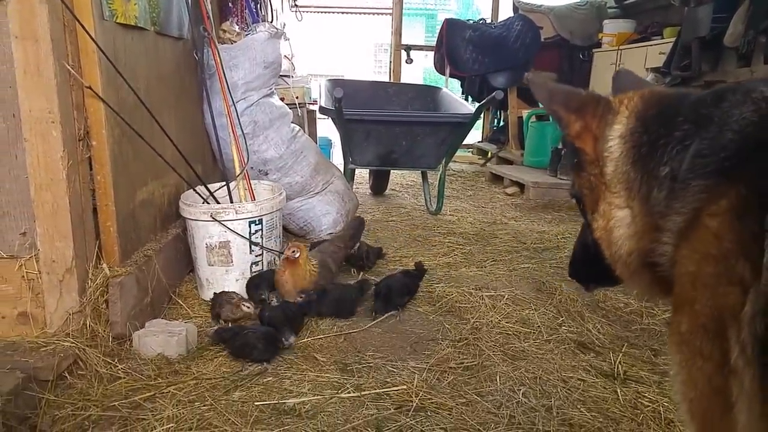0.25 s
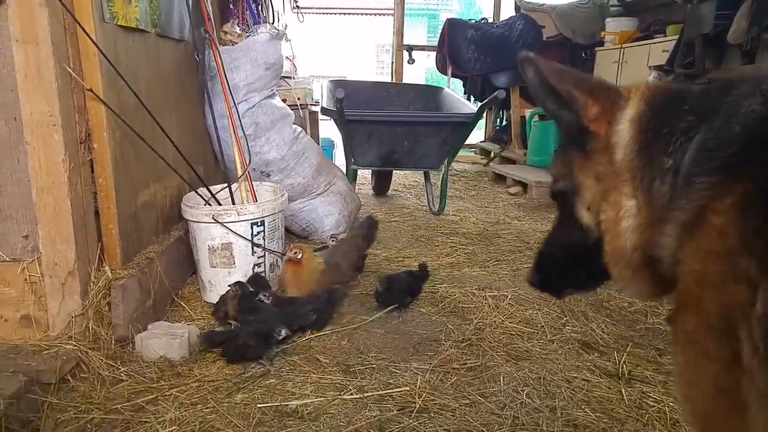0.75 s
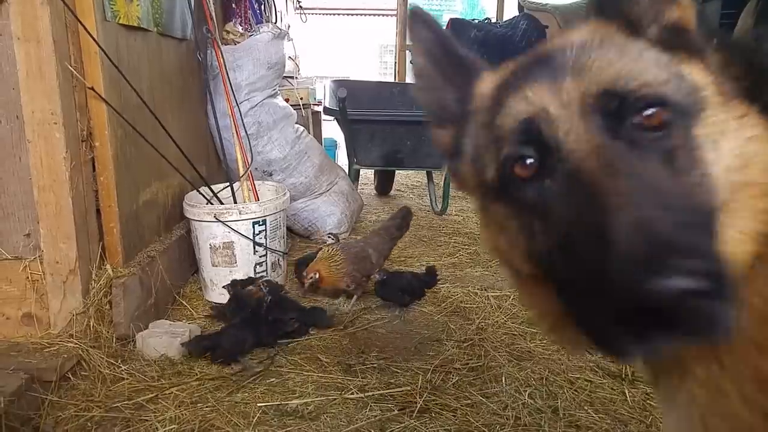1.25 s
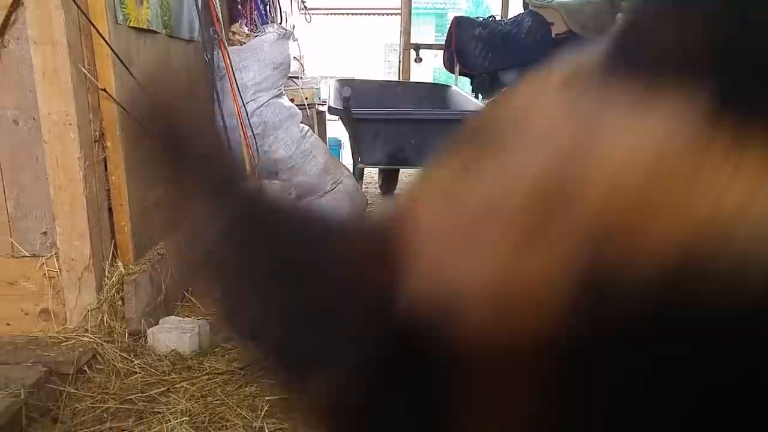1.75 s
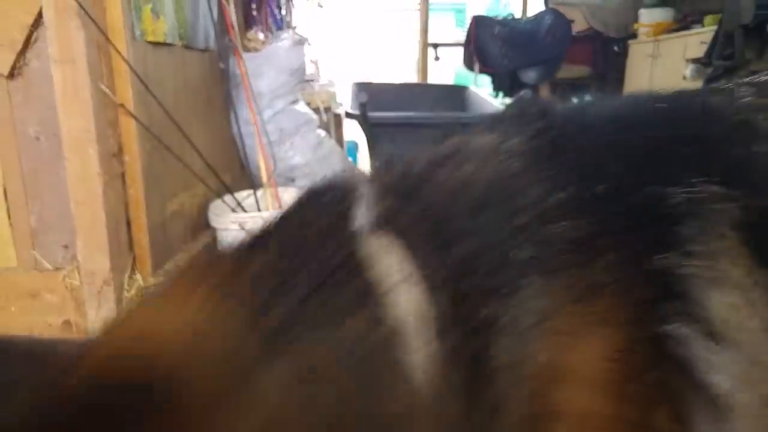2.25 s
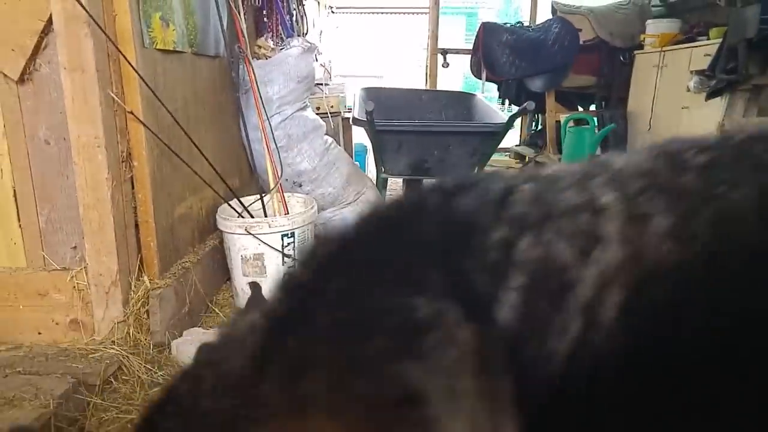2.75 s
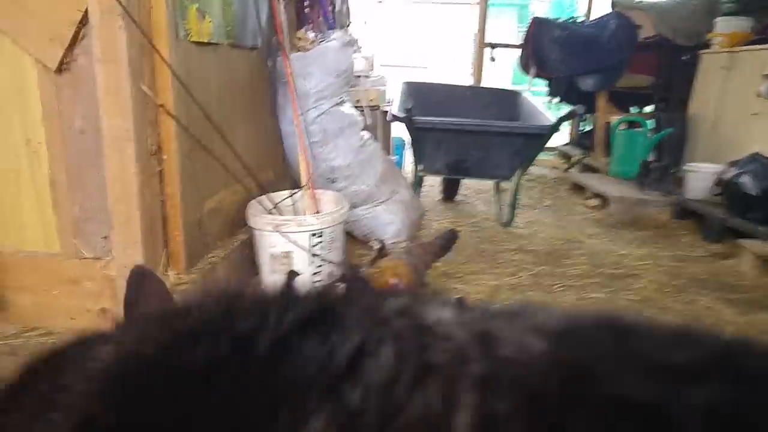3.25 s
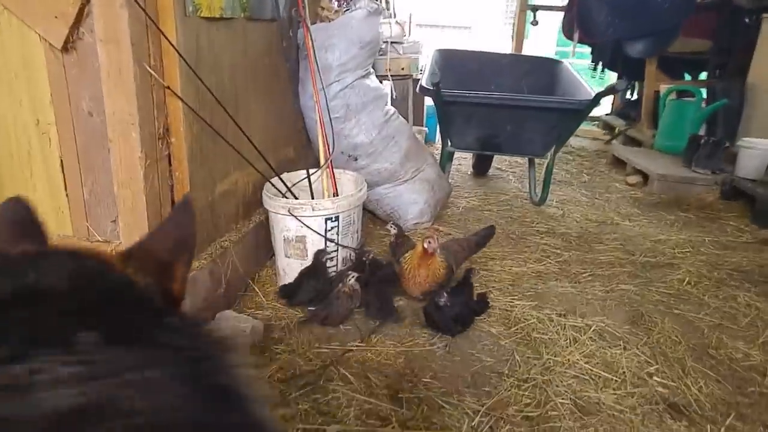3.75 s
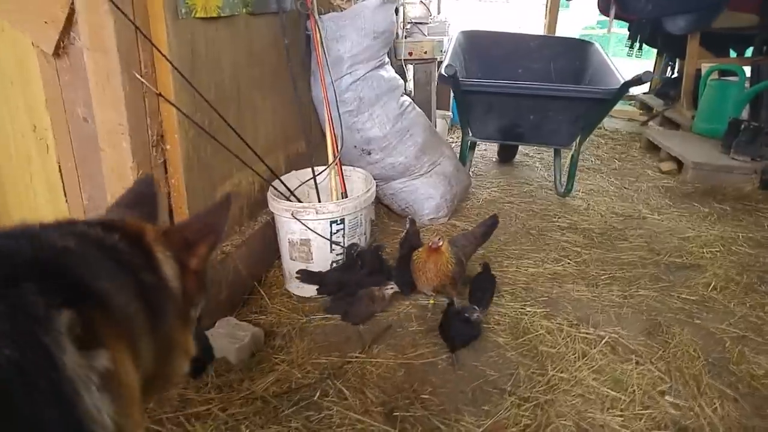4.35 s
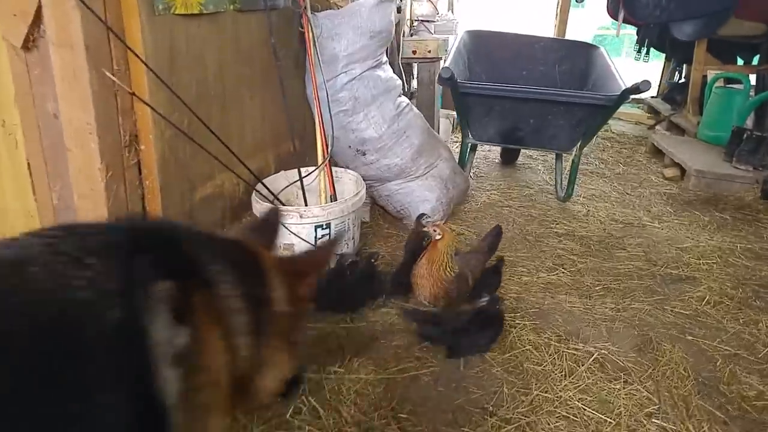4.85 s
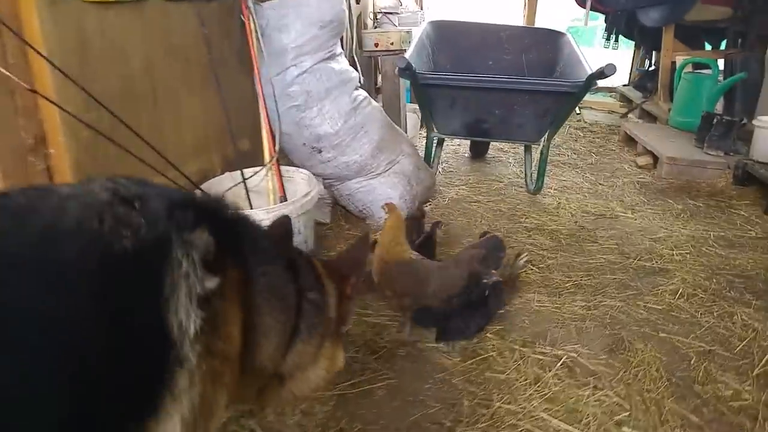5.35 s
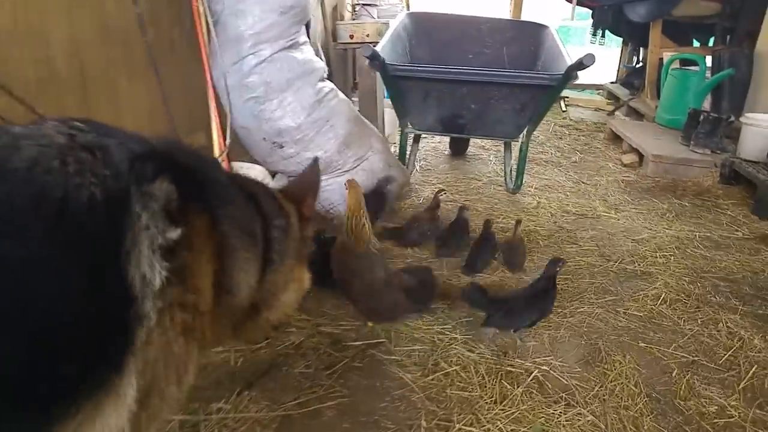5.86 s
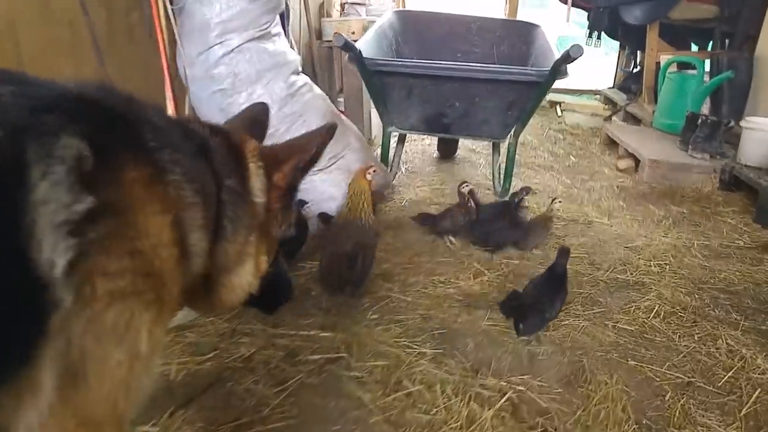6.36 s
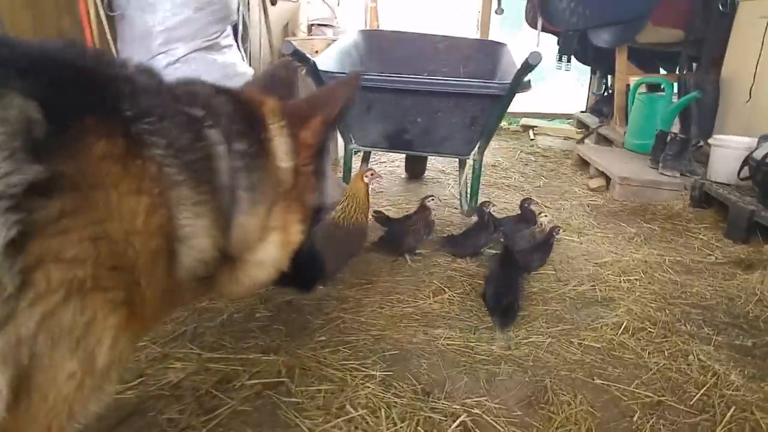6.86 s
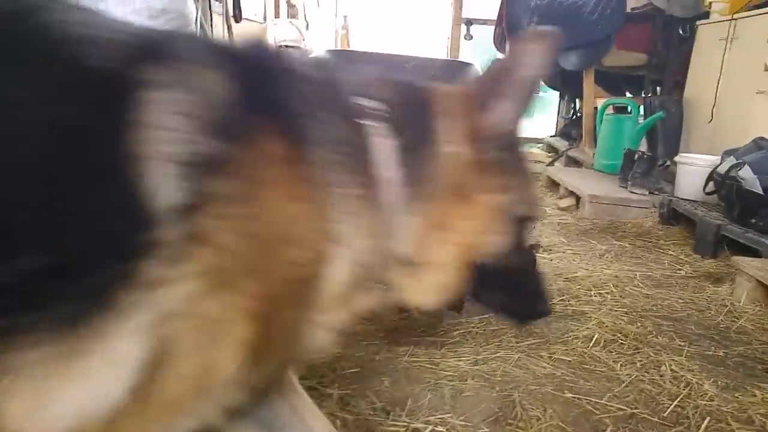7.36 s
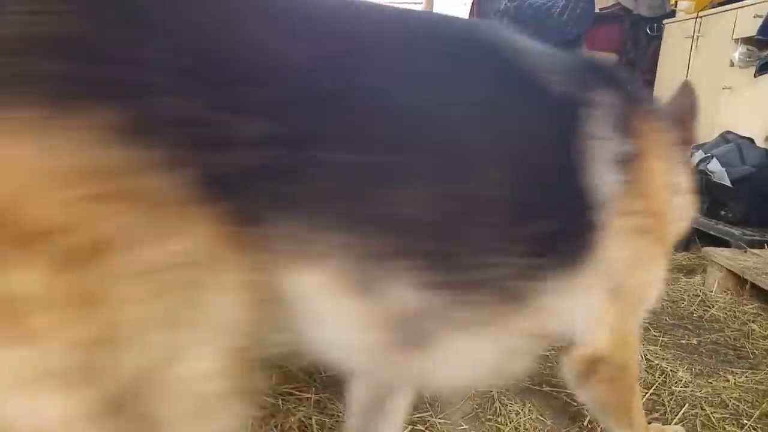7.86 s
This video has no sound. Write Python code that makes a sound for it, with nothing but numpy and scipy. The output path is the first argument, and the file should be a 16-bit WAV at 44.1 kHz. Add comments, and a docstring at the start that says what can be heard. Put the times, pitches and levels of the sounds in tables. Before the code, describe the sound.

Thin, gliding chick peeps over soft airy noise, with crackling straw, hollow bucket pecks, handling knocks, far shrill squeals, then startled squeaks and low clucks.

```python
"""Chicks peep and twitter round a clucking hen on the straw of a wooden shed: gliding near-sines for
the chicks, rough pulses through throat resonances for the hen. A dog treads in crackling straw, beaks tap
a bucket and knocks ring the case of the hand-held recorder. Shrill overtone-rich squeals come from
further off on the right, a train of sharp pulses buzzes briefly, and air noise and a low rumble lie below."""
import sys
import numpy as np
from scipy import signal
from scipy.io import wavfile
from scipy.ndimage import map_coordinates

SR = 44100
rng = np.random.default_rng(int(sys.argv[2]) if len(sys.argv) > 2 else 0)


def generate_wav(signal):
    """Clip the signal to [-1, 1] and save it as 16-bit WAV at the path in sys.argv[1]."""
    frames = np.transpose(np.atleast_2d(signal))
    scaled = np.clip(frames, -1, 1) * 32767
    pcm = np.round(scaled).astype(np.int16)
    wavfile.write(sys.argv[1], SR, pcm)


N = 357210
TIME = np.arange(N) / SR   # seconds

# Tone of the background air. Each row: frequency in Hz, relative strength in dB per Hz.
AIR_SPECTRUM = [(30, -9), (348, -7.5), (502, 1.5), (651, -4), (1760, -13.5), (7000, -9), (12700, -20.5)]
# Slow swell of the air. Each row: time in seconds, level in dB.
AIR_SWELL = [(0, -53.5), (1.3, -51.5), (2.65, -51), (3.1, -49), (6.1, -46), (6.6, -50.5), (8.1, -47)]
# Left-right balance of the air and straw. Each row: frequency in Hz, left minus right in dB.
NOISE_SIDES = [(60, -2.5), (380, 2.5), (2380, -4.5), (15000, 2.5)]

# Twitters whose pitch only sags. Each row: start in seconds, length in seconds, top pitch in Hz, level in dB.
TWITTER_CALLS = [(.09, 0.041, 5320, -45.5), (.2, 0.057, 4260, -47), (.31, 0.1, 4350, -48.5),
                 (.427, 0.022, 4900, -44.5), (.51, 0.075, 4406, -47.5), (.557, 0.04, 5160, -49),
                 (1.16, .05, 5100, -53), (1.315, 0.046, 5340, -48.5), (1.435, 0.083, 4380, -45),
                 (1.605, 0.081, 4340, -47.5), (1.69, 0.053, 4300, -51), (1.78, 0.084, 4280, -51.5),
                 (1.853, 0.048, 4520, -47), (2.487, 0.048, 4110, -49), (2.64, 0.059, 4180, -46.5),
                 (3.29, 0.031, 4970, -55), (3.745, .06, 4270, -44), (3.95, 0.063, 4350, -43),
                 (3.95, 0.046, 5030, -45), (4.125, 0.087, 4400, -41.5), (5.46, 0.023, 4640, -45),
                 (5.77, 0.055, 4025, -41), (6.76, 0.056, 4160, -52.5), (6.935, 0.064, 4260, -52)]
# Peeps that drop to the bottom of the voice. Each row: start in seconds, length in seconds,
# top pitch in Hz, level in dB.
PEEP_CALLS = [(0.113, 0.067, 4190, -47), (0.416, 0.07, 4500, -44.5), (0.56, 0.058, 4560, -39.5),
              (.735, 0.077, 4560, -42.5), (1.007, 0.034, 3620, -47), (1.052, 0.033, 3740, -43),
              (1.183, 0.032, 3800, -42.5), (1.302, 0.054, 4320, -43), (1.389, 0.046, 4720, -44.5),
              (1.534, 0.083, 4780, -44.5), (2.008, 0.13, 4420, -53.5), (2.19, 0.059, 4780, -49.5),
              (2.317, 0.073, 4760, -45.5), (2.832, 0.03, 3870, -47), (2.839, 0.085, 4130, -47.5),
              (3.445, 0.053, 5020, -47), (4.511, 0.07, 4040, -47.5), (4.655, 0.08, 4180, -44.5),
              (4.788, 0.056, 4310, -46), (4.849, 0.066, 4480, -48.5), (4.98, 0.057, 4830, -50.5),
              (5.871, 0.061, 3880, -39.5), (6.51, 0.067, 4590, -50), (6.542, .11, 4580, -48.5),
              (6.663, 0.073, 4570, -50.5), (6.785, 0.092, 5090, -51), (7.248, 0.11, 4560, -48.5),
              (7.266, 0.04, 3800, -48), (7.456, 0.088, 4830, -48), (7.72, 0.035, 3630, -48),
              (8.011, 0.049, 4220, -45)]
# Startled squeaks. Each row: start in seconds, starting pitch in Hz, level in dB.
SQUEAK_CALLS = [(5.054, 1960, -45.5), (5.612, 2480, -32.5), (5.92, 1950, -37), (5.93, 2380, -38.5),
                (6.041, 2106, -40.5)]
SCATTER_S = 4.45   # the dog noses in: from here calls are shaky and swell as they fall
BOTTOM_HZ, TWITTER_SAG, SQUEAK_SAG = 2650, 0.1203, 0.025   # end of a peep; shares of pitch lost
LIFT_HZ, TOP_AT = 241, 0.202   # rise into the top pitch; where the top lies in the call, 0-1
CALM_FALL_POWER, SHAKY_FALL_POWER = 1.9, 1.6   # how much the fall steepens
SQUEAK_S = 0.032   # length in seconds

# Knocks on the recorder. Each row: start in seconds, peak in dB (average of both sides), hardness in dB.
KNOCK_HITS = [(.215, -39, 0), (.433, -35, -9), (1.659, -20.5, 9), (1.743, -28.5, -14), (2.16, -32, 8),
              (3.954, -30, -1), (4.379, -29.5, 6), (4.485, -34.5, -12), (4.741, -29.5, -20),
              (5.309, -24, 2), (5.433, -28.5, -30), (7.361, -34, -10), (7.72, -27, -22), (7.804, -21, -19),
              (7.924, -31.5, 2)]
# Ringing of the recorder case. Each row: frequency in Hz, time to fade by 60 dB in seconds,
# level in dB, share of the hardness it takes on.
CASE_MODES = [(89.5, 0.016, -17.5, 1), (342, 0.009, 6, 0.082), (681, 0.014, 8.5, 0.27),
              (1544, 0.0068, 2.5, 0.29), (2400, 0.0016, 16.5, 0.43)]
KNOCK_PAN_DB = -34   # left minus right
CONTACT_S = .0011   # onset time of a knock or peck, in seconds

# Beaks on the bucket. Each row: start in seconds, level in dB.
PECK_HITS = [(.938, -35.5), (2.036, -36.5), (2.124, -38.5), (2.35, -37), (2.801, -27), (2.842, -44),
             (2.92, -41), (3.535, -39), (3.717, -33.5), (4.62, -33.5), (5.272, -37)]

# Far squeals. Each row: start in seconds, length in seconds, pitch at start in Hz, pitch at end in Hz,
# level of the clear voice in dB, level of the hoarse breath in dB.
SQUEAL_CALLS = [(1.118, 0.064, 982, 950, -57, -79), (1.365, 0.19, 1419, 1430, -55, -65.5),
                (1.807, 0.24, 1080, 1111, -58.5, -64), (2.105, 0.19, 1388, 1430, -58, -62.5),
                (2.464, 0.26, 1137, 1200, -65, -78.5), (2.733, 0.13, 1330, 1264, -87, -56.5),
                (2.99, 0.43, 1015, 1052, -58, -61), (3.002, 0.26, 1162, 1275, -45, -56),
                (3.28, 0.17, 1461, 1593, -44.5, -47), (3.468, 0.21, 1309, 1388, -37.5, -47),
                (3.525, 0.17, 1452, 1436, -42, -59), (3.617, 0.23, 1518, 1405, -43.5, -45.5),
                (3.718, 0.15, 1096, 994, -62, -42.5), (4.045, 0.14, 1051, 1008, -59, -43.5),
                (4.069, 0.39, 1365, 1312, -40.5, -60.5)]
# Throat of the squeals. Each row: frequency in Hz, gain in dB.
SQUEAL_THROAT_GAINS = [(1000, -12.5), (1400, -18.5), (2050, 0), (2750, 3), (3400, -15), (5100, -18)]

# Treads in the straw. Each row: moment of full weight in seconds, level in dB.
TREADS = [(1.229, -39), (1.53, -45), (1.78, -43), (3.45, -42), (4.0, -48), (4.52, -47), (4.76, -47.5),
          (5.651, -40), (5.94, -42), (7.019, -46), (7.16, -43), (7.399, -43.5)]
# Single stalks that snap. Each row: start in seconds, peak in dB.
STALK_SNAPS = [(2.467, -32), (7.921, -24), (7.973, -29.5)]
# Tone of the straw. Each row: frequency in Hz, relative strength in dB per Hz.
STRAW_SPECTRUM = [(300, 4), (700, 14), (3000, 17), (6500, 25), (15000, 15)]
PRESS_S, LIFT_S = 0.035, 0.092   # seconds in which a paw sinks in, then eases off

# Hen clucks. Each row: start in seconds, length in seconds, level in dB, mouth opening from 0 to 1,
# starting pitch in Hz.
HEN_CLUCKS = [(5.233, 0.023, -42.5, 0.7, 242), (5.315, 0.034, -46.5, 0.77, 253),
              (5.446, 0.12, -44, 1, 315.3), (5.778, 0.066, -45, 0.75, 341.8),
              (6.042, 0.052, -46.5, 0.76, 275), (6.318, 0.059, -45.5, 0.62, 348.3),
              (6.711, 0.051, -42.5, 0.4, 367.6)]
# Resonances of the hen's throat. Each row: frequency in Hz, width in Hz, level in dB at half-open mouth.
HEN_THROAT = [(385, 175, 2), (686, 390, 3.5), (1173, 490, 0.5)]
CLUCK_SAG, CLUCK_JITTER, CLUCK_NOISE = .14, .07, 1.0   # shares of sag, wobble and breath

# Course of the buzz. Each row: time in seconds, pulse rate in Hz, level in dB.
BUZZ_COURSE = [(5.33, 193.3, -62.5), (5.451, 197, -54), (5.849, 204.5, -57), (5.98, 210.6, -59)]

PEEP_ECHO_DB, CLUCK_ECHO_DB, FAR_ECHO_DB = -4, 2, -2   # echo gains
# Dips of the microphone ports. Each row: frequency in Hz, width in Hz.
PORT_DIPS = [(515, 104), (7800, 260)]
CUTOFF_HZ = 15500   # 70 dB down from here up


def amp(db):
    """Turns dB into gain."""
    return 10 ** (np.asarray(db) / 20)


def rms_one(x):
    """Scales a sound to an rms (average strength) of 1."""
    return x / np.sqrt(np.mean(x ** 2) + 1e-20)


def at_hz(points, hz):
    """Reads a spectrum between its points, on a log-frequency axis."""
    points = np.array(points)
    return np.interp(np.log(hz), np.log(points[:, 0]), points[:, 1])


def drift(rate, size=N):
    """Wanders at random with a spread of about 1: 2 * rate random points a second, joined smoothly."""
    steps = np.arange(size) * 2 * rate / SR
    points = rng.standard_normal(int(steps[-1]) + 4)
    return map_coordinates(points, [steps + 1], order=3)


def resonance(x, hz, width_hz):
    """Lets one frequency ring: a two-pole peak of gain 1."""
    r = np.exp(-np.pi * width_hz / SR)
    feed = np.array([1, 0, -1]) * (1 - r * r) / 2
    return signal.lfilter(feed, [1, -2 * r * np.cos(2 * np.pi * hz / SR), r * r], x)


def band(x, low_hz, high_hz):
    """Keeps the frequencies between two limits."""
    return signal.sosfilt(signal.butter(2, [low_hz, high_hz], "band", fs=SR, output="sos"), x)


def add(out, s, sound):
    """Mixes a sound in at a time in seconds."""
    i = round(s * SR)
    out[..., i:i + sound.shape[-1]] += sound[..., :N - i]


def note(length, rise, fall):
    """Gives the progress 0-1 through a note and its rounded loudness curve."""
    u = np.linspace(0, 1, round(length * SR))
    ramp = np.minimum(u / rise, (1 - u) / fall)
    return u, np.sqrt(np.clip(ramp, 0, 1))


def cycles(hz):
    """Adds up a pitch curve into a running phase."""
    return 2 * np.pi * np.cumsum(hz) / SR


def sides(pan_db):
    """Splits a left-right level difference into two gains."""
    return amp(np.array([pan_db, -pan_db]) / 2)


def place(x, pan_db, lag):
    """Sets a direction by level, and by a left side late by some samples (negative: early)."""
    left = np.interp(np.arange(N) - lag, np.arange(N), x)
    return sides(pan_db)[:, None] * np.array([left, x])


def banded_noise(spectrum, patchy_db, grains=1):
    """Builds noise from half-octave bands, unrelated left and right, each flickering by itself."""
    out = 0
    edges = 30 * 2 ** np.arange(0, 9.6, .5)   # Hz
    white = rng.standard_normal((2, 2, N)) * grains
    for k, (low, high) in enumerate(zip(edges, edges[1:])):
        hz = np.sqrt(low * high)
        flicker = amp(at_hz(spectrum, hz) + patchy_db * drift(9))
        gain = flicker * sides(at_hz(NOISE_SIDES, hz))[:, None]
        # two noises take turns from band to band
        out = out + gain * band(white[k % 2], low, high)
    return rms_one(out)


def shed(x, t60, cut_hz):
    """Echoes of the shed: decaying noise as the pattern, another one on each side."""
    t = TIME[:round(SR * .5)]
    fade = amp(-60 * t / t60) * (t > .004)   # the echoes wait 4 ms
    tail = band(rng.standard_normal((2, len(t))), 170, cut_hz) * fade
    tail = tail / np.sqrt(np.sum(tail ** 2) / 2)
    return signal.oaconvolve(x[None], tail, axes=1)[:, :N]


def air():
    """Background noise that swells slowly, over a wavering rumble from a broad low resonance."""
    s, level_db = np.transpose(AIR_SWELL)
    noise = amp(np.interp(TIME, s, level_db)) * banded_noise(AIR_SPECTRUM, 3.16)
    rumble = rms_one(resonance(rng.standard_normal(N), 52.0, 34.0))
    rumble = rumble * amp(-61.0 + 2 * drift(1.46))
    return noise + place(rumble, -10.5, -120)


def chatter(count=36):
    """Draws fainter twitters of the rest of the brood, at random times, lengths and pitches."""
    s, top, length, faint = rng.random((count, 4)).T
    rows = [s * N / SR, .04 + .05 * length, 3700 + 1700 * top, -59 - 6 * faint]
    return np.transpose(rows).tolist()


def chicks():
    """Near sines: a short rise, then a steepening fall; squeaks are rough with a stronger octave."""
    out = np.zeros(N)
    calls = [(*row, BOTTOM_HZ) for row in PEEP_CALLS]
    for row in list(TWITTER_CALLS) + chatter():
        calls.append((*row, row[2] * (1 - TWITTER_SAG)))
    for s, length, top, level_db, end in calls:
        calm = s < SCATTER_S
        u, env = note(length, 0.18, 0.3 if calm else .05)
        rise = LIFT_HZ * np.clip(1 - u / TOP_AT, 0, 1) ** 2
        fallen = np.clip((u - TOP_AT) / (1 - TOP_AT), 0, 1)
        fall = (top - end) * fallen ** (CALM_FALL_POWER if calm else SHAKY_FALL_POWER)
        shake = .006 if calm else .045   # share of the pitch
        wobble = shake * drift(92.7 if calm else 190.0, len(u))
        turn = cycles((top - rise - fall) * (1 + wobble))
        flutter_db = (1 if calm else 3.5) * drift(63.6, len(u))
        swell_db = 3.3 * (u - 1.0) * (s > SCATTER_S)
        tone = np.sin(turn) + amp(-16.0) * np.sin(2 * turn)
        add(out, s, amp(level_db + flutter_db + swell_db) * env * tone)
    for s, pitch, level_db in SQUEAK_CALLS:
        u, env = note(SQUEAK_S, 0.18, 0.82)
        turn = cycles(pitch * (1 - SQUEAK_SAG * u + .065 * drift(200, len(u))))
        tone = np.sin(turn) + amp(-8.0) * np.sin(2 * turn)
        add(out, s, amp(level_db + 2.6 * drift(66, len(u))) * env * tone)
    return out


def knocks():
    """Each blow rings the recorder case; hardness sets the low thump most, then the upper tones."""
    out, t = np.zeros((2, N)), TIME[:SR // 6]
    near = sides(KNOCK_PAN_DB) / np.mean(sides(KNOCK_PAN_DB))
    for s, peak_db, hard_db in KNOCK_HITS:
        ring = 0
        for hz, t60, db, share in CASE_MODES:
            ring = ring + amp(db + share * hard_db - 60 * t / t60) * np.sin(2 * np.pi * hz * t)
        ring = ring * np.minimum(t / CONTACT_S, 1)
        add(out, s, -amp(peak_db) * near[:, None] * ring / np.abs(ring).max())
    return out


def pecks():
    """Short hollow taps: each rings two wall resonances of the bucket, at a slightly different pitch."""
    out, t = np.zeros(N), TIME[:SR // 20]
    spreads = rng.uniform(0.86, 1.143, len(PECK_HITS))
    for (s, level_db), spread in zip(PECK_HITS, spreads):
        low = np.sin(2 * np.pi * 720 * spread * t) * amp(-60 * t / 0.032)
        high = .6 * np.sin(2 * np.pi * 1300 * spread * t) * amp(-60 * t / 0.0097)
        add(out, s, amp(level_db) * (low + high) * np.minimum(t / CONTACT_S, 1))
    return out


def squeals():
    """Five overtones shaped by a throat, blurred into bands by hoarseness, with hissing breath."""
    out = np.zeros(N)
    orders = (1, 2, 3, 4, 5)
    for s, length, start, end, voice_db, breath_db in SQUEAL_CALLS:
        rising = end > start
        # rising notes level off; falling ones swell slowly and droop late
        u, env = note(length, 0.2 if rising else .55, 0.28)
        glide = 1 - (1 - u) ** 2 if rising else u ** 2
        shake = .003 + .03 * min(amp(breath_db - voice_db), 1)   # breathy notes shake more
        hz = start + (end - start) * glide
        turn = cycles(hz * (1 + shake * drift(60.82, len(u))))
        stack, hoarse = 0, 0
        for k in orders:
            throat_db = at_hz(SQUEAL_THROAT_GAINS, k * start)
            stray = k ** 3 / 80 * drift(70, len(u))   # high orders lose step
            stack = stack + amp(throat_db) * np.sin(k * turn + stray)
            hoarse = hoarse + amp(throat_db / 2) * drift(50.0 * k, len(u)) * np.sin(k * turn)
        breath = hoarse + 3.0 * band(rng.standard_normal(len(u)), 3500, 4970)
        voice = amp(voice_db + (1.3 + 58 * shake) * drift(32.0, len(u))) * stack
        add(out, s, env ** 2 * (voice + amp(breath_db) * rms_one(breath)))
    return out


def straw():
    """Dense crackle of random grains under each tread, and noise bursts for stalks that snap."""
    sizes = amp(3.2 * np.minimum(rng.exponential(1, N), 4))
    grains = sizes * (rng.random(N) < 4000 / SR)   # about 4000 a second
    press = np.zeros(N)
    for s, level_db in TREADS:
        press += amp(level_db) * np.interp(TIME, [s - PRESS_S, s, s + LIFT_S], [0, 1, 0])
    out = press * banded_noise(STRAW_SPECTRUM, 2.0, grains + .5)   # .5: soft rustle between grains
    t = TIME[:SR // 100]
    for s, peak_db in STALK_SNAPS:
        burst = rng.standard_normal((2, len(t))) * amp(-60 * t / 0.042)
        snap = band(burst, 3400, 7800)
        add(out, s, amp(peak_db) * snap / np.abs(snap).max())
    return out


def hen():
    """Uneven pulses into the throat; an open mouth lifts the upper resonances, which die first."""
    out = np.zeros(N)
    for s, length, level_db, mouth, pitch in HEN_CLUCKS:
        u, env = note(length, 0.17, 0.43)
        turn = cycles(pitch * (1 - CLUCK_SAG * u + CLUCK_JITTER * drift(72.8, len(u))))
        pulses = amp(3.5 * drift(100, len(u))) * np.exp(6 * (np.cos(turn) - 1))
        pulses = pulses * (1 + CLUCK_NOISE * rng.standard_normal(len(u)))
        voice = 0
        for k, (hz, width, db) in enumerate(HEN_THROAT):
            ring = resonance(resonance(pulses, hz, width), hz, width)
            gain = amp(db + 13.0 * (mouth - .5) * k) * (-1) ** k
            voice = voice + gain * env ** k * ring
        add(out, s, amp(level_db) * env * env * rms_one(voice))
    return out


def buzz():
    """A train of sharp pulses of which only the middle overtones carry."""
    s, rate_hz, level_db = np.transpose(BUZZ_COURSE)
    turn = cycles(np.interp(TIME, s, rate_hz) * (1 + 0.0036 * drift(11.0)))
    pulses = np.exp(300 * (np.cos(turn) - 1))
    pulses = band(band(pulses, 1850, 3500), 1530, 3300)
    level = amp(np.interp(TIME, s, level_db, left=-120, right=-120))   # near silent outside
    return level * rms_one(pulses)


def scene():
    """Flock close by, squeals far right with longer echoes, knocks straight on the recorder."""
    peeps, clucks, taps, far = chicks(), hen() + buzz(), pecks(), squeals()
    echo_feed = amp(PEEP_ECHO_DB) * (peeps + taps) + amp(CLUCK_ECHO_DB) * clucks
    echoes = shed(echo_feed, 0.15, 10300)
    flock = place(peeps, -9.0, -7.0) + place(clucks + taps, -3.0, -9.0) + echoes
    distant = place(far, -15.0, -7.0) + amp(FAR_ECHO_DB) * shed(far, 0.99, 5200)
    return flock + distant + knocks() + straw() + air()


def record(dry):
    """The recorder's tone: a bass cut, two narrow dips from the ports, then a steep treble cut."""
    dry = signal.sosfilt(signal.butter(6, 48, "high", fs=SR, output="sos"), dry)
    for hz, width in PORT_DIPS:
        dry = dry - resonance(dry, hz, width)
    return signal.sosfilt(signal.cheby2(14, 70, CUTOFF_HZ, fs=SR, output="sos"), dry)


dry = scene()
out = record(dry)
generate_wav(out)
```